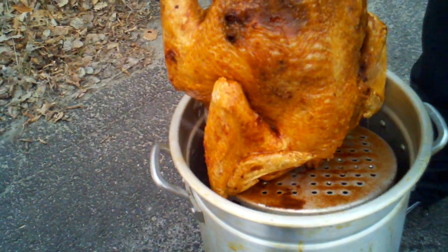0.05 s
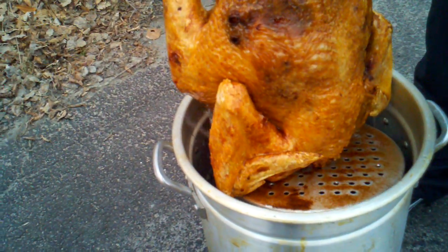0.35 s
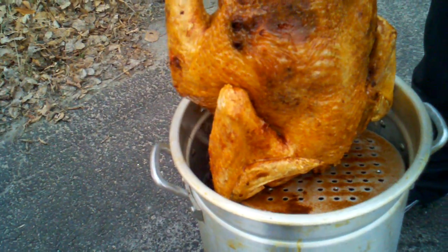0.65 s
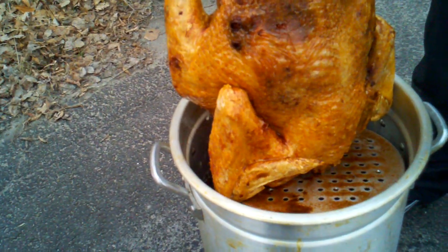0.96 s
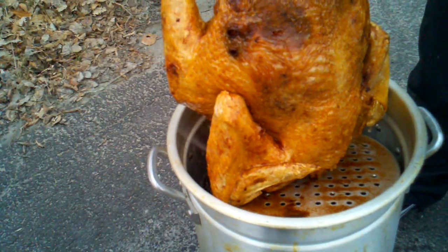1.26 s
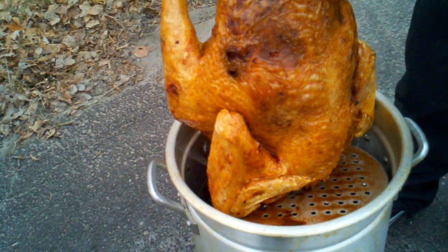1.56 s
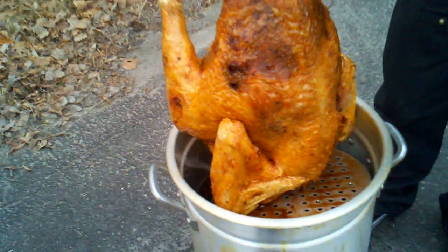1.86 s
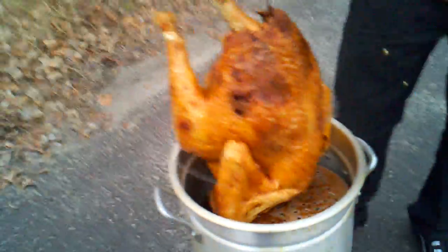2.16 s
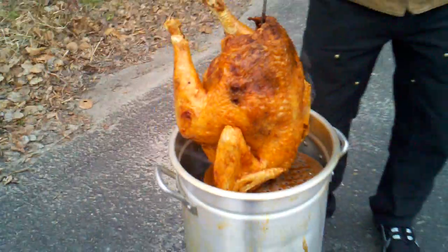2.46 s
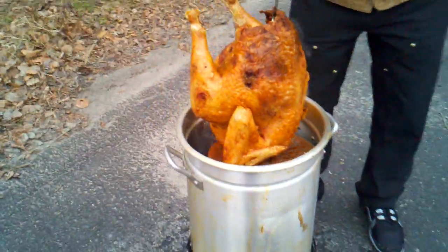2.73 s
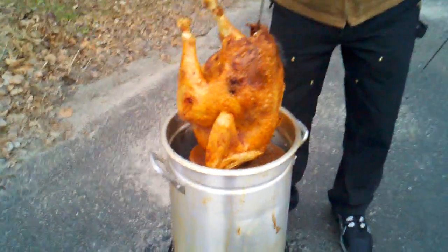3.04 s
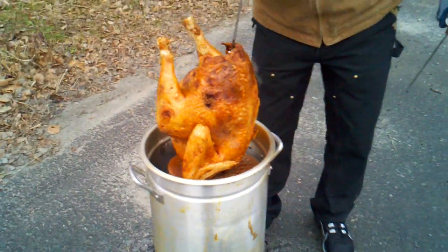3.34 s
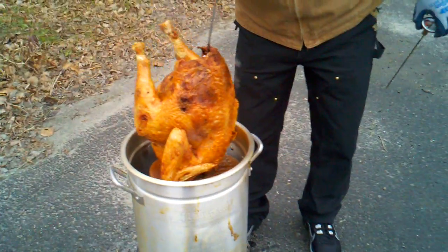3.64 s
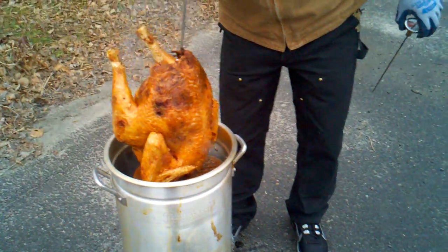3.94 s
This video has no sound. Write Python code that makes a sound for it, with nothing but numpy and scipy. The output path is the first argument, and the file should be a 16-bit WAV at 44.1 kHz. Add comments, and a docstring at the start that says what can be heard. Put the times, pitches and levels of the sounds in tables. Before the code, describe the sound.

Hot oil sizzles, bubbles and pops in a pot over a roaring gas burner outdoors.

```python
"""On a driveway outdoors, a fried turkey is held over a pot of hot oil on a gas burner.
The flame roars and makes the pot hum. Steam bubbles ring in the oil, and thousands of tiny bursts
blend into a sizzle. Water drops pop, and oil spits on hot metal. Midway come a hollow, falling gurgle
and a shoe scuff, later a soft footstep. The microphone backs away and the sizzle fades."""
import sys
import numpy as np
from scipy import signal
from scipy.fft import rfft, irfft
from scipy.io import wavfile

SR = 44100
rng = np.random.default_rng(int(sys.argv[2]) if len(sys.argv) > 2 else 0)


def store_pcm(level_fs):
    """Save levels as 16-bit WAV."""
    pcm = np.round(np.clip(level_fs, -1, 1) * 32767).astype(np.int16)
    wavfile.write(sys.argv[1], SR, np.atleast_2d(pcm).T)


N = 176400
TIME = np.arange(N) / SR
FREQS = np.maximum(np.arange(N // 2 + 1) * SR / N, 1)

# how alike the left and right noise are: (frequency [Hz], likeness [-1 to 1])
STEREO_LIKENESS = [(30, 0), (90, 0.34), (300, 0.45), (620, 0.89), (1100, 0.6), (2000, 0), (4000, 0),
                   (14000, 0)]
# the fade as the microphone backs away: (time [s], level [dB])
DISTANCE_FADE = [(0, 0.5), (1.3, 1.5), (2, -1), (2.7, -1.6), (3.3, -4), (4, -6)]
# the tone of the flame's roar: (frequency [Hz], level [dB per Hz])
ROAR_TONE = [(25, -101), (42, -100), (57, -83), (70, -87), (85, -66), (108, -72.5), (140, -71),
             (180, -66.5), (290, -70.5), (410, -72.5), (520, -68.5), (630, -66), (760, -72.5), (950, -77.5),
             (1500, -80.5), (2100, -75), (2800, -102), (6000, -105)]
# how the roar rises and falls: (time [s], level [dB])
ROAR_LOUDNESS = [(0, -0.5), (1.0, 0), (1.5, -0.5), (1.8, 3.5), (2.1, 1), (2.6, -.5), (3.3, -0.8), (4, -3)]
# low hums of burner and pot, plus one faint, thin high tone: (pitch [Hz], width [Hz], level [dB])
HELD_TONES = [(119.5, 5, -56.5), (240, 6, -58), (665, 7, -54.5), (880, 4, -59.5), (1064, 4, -60),
              (1240, 10, -63), (1591, 4, -65), (3854, 8, -67)]
# the tone of a shoe scuff: (pitch [Hz], width [Hz], relative level [dB])
SCUFF_TONE = [(830, 210, -1.5), (1520, 220, -2), (1920, 1300, 3.5)]
# the path of the gurgle: (time [s], pitch [Hz], level [dB])
GURGLE_PATH = [(1.03, 591, -60), (1.14, 590, -43.5), (1.3, 621, -46), (1.56, 650, -51), (1.61, 690, -39),
               (1.65, 685, -33), (1.685, 655, -34), (1.71, 581, -38), (1.74, 580, -49), (1.9, 540.5, -48.5),
               (1.96, 616, -39), (2.02, 619, -57)]
# how the bubbling rises and falls: (time [s], level [dB])
BUBBLE_LOUDNESS = [(0, -47), (1.2, -45), (1.7, -44.5), (2.3, -43), (2.7, -51), (3.3, -48.5), (4, -55.5)]
# large bubbles bursting: (time [s], level [dB], pitch [Hz])
BIG_BUBBLES = [(0.104, -32, 1610), (.224, -28, 1500), (.875, -39, 1700), (1.13, -33, 1240),
               (1.225, -30.5, 1330), (1.538, -35, 1350), (1.646, -29, 1980), (1.658, -28, 1590),
               (1.707, -35, 1350), (1.878, -33, 1300), (2.042, -30, 1500), (2.204, -32, 1540),
               (2.403, -30, 1900), (3.161, -28.5, 1980)]
# oil hitting hot metal: (time of peak [s], half length [s], level [dB])
OIL_SPITS = [(0.397, 0.012, -36), (1.88, 0.049, -31), (2.236, 0.019, -42), (2.41, 0.021, -52)]
# the tone of a spit: (pitch [Hz], width [Hz], relative level [dB])
SPIT_TONE = [(3750, 950, 2), (4110, 220, -1.5), (5770, 730, 6.5), (9000, 2500, -27)]
# water drops bursting: (time [s], crack [dB], spit [dB], knock [dB], time to fall 60 dB [s], snap [dB])
DROP_POPS = [(.0722, -23.5, -29, -44, 0.021, -10), (.3032, -14.5, -33, -52, 0.012, -8),
             (0.3506, -23, -48, -45, 0.017, -26), (0.3682, -31, -39, -31, .014, -17),
             (0.83, -40, -37, -33, 0.018, -26), (0.9824, -21.5, -33, -50, 0.03, -14),
             (1.1562, -34, -47, -33, 0.012, -30), (1.2292, -28, -25.5, -36, 0.05, -30),
             (1.4584, -20, -36, -37, 0.0072, -7), (1.795, -25, -41, -29, 0.017, -18),
             (2.1447, -18.5, -28.5, -25.5, 0.016, -8), (2.3825, -32, -31.5, -50, .03, -34),
             (3.0182, -33, -36, -41, 0.014, -14), (3.2735, -34.5, -37, -42, 0.019, -21)]
# the tone of a drop's bright crack: (pitch [Hz], width [Hz], relative level [dB])
CRACK_TONE = [(8320, 810, 3), (8900, 140, 11.5), (11700, 1300, 2)]
# the smallest bubbles: (rate [per s], lowest pitch [Hz], highest pitch [Hz], ring [cycles], level [dB])
TINY_BUBBLES = [(260, 3400, 6500, 30, -52), (260, 7600, 9600, 45, -44.5)]
# the tone of the sizzle: (frequency [Hz], level [dB per Hz])
SIZZLE_TONE = [(1000, -94), (2700, -81.5), (3500, -81.5), (5000, -82), (6000, -76), (6900, -80),
               (7800, -73), (9200, -72), (10300, -78), (11300, -78), (12200, -77.5), (14000, -78)]
# how the sizzle rises and falls: (time [s], level [dB])
SIZZLE_LOUDNESS = [(0, -2), (.27, -1.5), (.45, -2), (.72, -0.5), (.9, -0.5), (1.0, -2), (1.3, -3),
                   (1.42, 0), (1.62, 2), (1.77, 1.5), (1.9, 5.5), (1.98, 1), (2.16, -2), (2.24, 5),
                   (2.33, -2), (2.42, 4), (2.52, -1), (2.66, -0.5), (2.78, -3), (2.9, 0.5), (3.22, -0.5),
                   (3.4, -2), (3.62, -1), (3.74, -3.5), (4, -3.5)]
# how each band of the sizzle moves: (frequency [Hz], strength of the fade [factor], flicker [dB])
SIZZLE_BANDS = [(4000, 0.13, 3.5), (7000, 0.076, 2.75), (7900, 2.3, 4), (9100, 0.45, 1.5),
                (10700, 0.27, 2.5)]
# how much of each side is taken away from the other: (frequency [Hz], share [0 to 1])
WIDENING = [(300, 0.017), (700, 0.4), (1300, 0.78), (2500, 1), (3000, 0.7), (3950, 0.47), (4600, 0.27),
            (7800, 0.17), (13000, 0.097)]


def from_db(db):
    """Turn decibels into a number to multiply by."""
    return 10 ** (np.asarray(db) / 20)


def rms_one(x):
    """Scale a sound so that its average strength (rms) is 1."""
    return x / np.sqrt(np.mean(x ** 2) + 1e-20)


def in_time(rows):
    """Join a table's points over time, giving one curve for each column after the first."""
    times, *columns = np.transpose(rows)
    return [np.interp(TIME, times, column) for column in columns]


def per_hz(points):
    """Read a table at every frequency."""
    hz, value = np.transpose(points)
    return np.interp(np.log(FREQS), np.log(hz), value)


def coloured(x, tone):
    """Give white noise of strength 1 a tone, in dB per Hz."""
    return irfft(rfft(x) * from_db(per_hz(tone)) * np.sqrt(SR / 2), N)


def drift(rate_hz):
    """A random wobble of strength 1, mostly slower than rate_hz."""
    return rms_one(irfft(rfft(rng.standard_normal(N)) / (1 + (FREQS / rate_hz) ** 2), N))


def stereo_noise():
    """White noise at two microphones, most alike in the low middle pitches."""
    alike = np.clip(per_hz(STEREO_LIKENESS), -.99, .99)
    mid, side = irfft(rfft(rng.standard_normal((2, N))) * np.sqrt([1 + alike, 1 - alike]), N)
    return np.array([mid + side, mid - side]) / np.sqrt(2)


def resonate(x, hz, width_hz):
    """Make a sound ring at one pitch; a smaller width rings longer."""
    r = np.exp(-np.pi * width_hz / SR)
    feedback = [1, -2 * r * np.cos(2 * np.pi * hz / SR), r * r]
    return signal.lfilter(np.array([1, 0, -1]) * (1 - r * r) / 2, feedback, x + 1e-18)


def resonant_noise(tone):
    """Noise of strength 1, gathered around a few pitches."""
    air, out = stereo_noise(), 0
    for k, (hz, width, db) in enumerate(tone):
        shifted = np.roll(air, k * SR // 3, axis=1)  # keeps the bands unrelated
        band = resonate(resonate(shifted, hz, 2 * width), hz, 2 * width)
        out = out + from_db(db) * rms_one(band)
    return rms_one(out)


def clicks(per_s, spread_db):
    """Random clicks, many small and a few large."""
    sizes = from_db(spread_db * np.minimum(rng.exponential(1, N), 5))
    return sizes * rng.choice([-1, 1], N) * (rng.random(N) < per_s / SR)


def swell(peak_s, half_s, db):
    """A bell-shaped rise and fall."""
    return from_db(db) * np.exp(-.5 * ((TIME - peak_s) / half_s) ** 2)


def burst(start_s, decay_s):
    """A sudden start that falls by 60 dB in decay_s."""
    return (TIME >= start_s) * from_db(-60 * np.clip((TIME - start_s) / decay_s, 0, 3))


def bubble_cloud(per_s, low_hz, high_hz, cycles, spread_db, pitches):
    """Bubbles appear at random, and each rings briefly at one of several pitches."""
    alike, out = 0.17, 0  # left and right are only a little alike
    for hz in np.geomspace(low_hz, high_hz, pitches):
        births = clicks(per_s / pitches, spread_db)
        sides = np.sqrt(alike) + np.sqrt(1 - alike) * rng.choice([-1, 1], (2, N))
        width_hz = np.log(1000) / np.pi * hz / cycles  # falls 60 dB in that many cycles
        out = out + rms_one(resonate(births * sides, hz, width_hz))
    return rms_one(out)


def burner():
    """The gas flame roars and sets burner and pot humming low; a faint, thin high tone sounds too."""
    air = stereo_noise()
    tones = sum(from_db(db) * rms_one(resonate(air, hz, width)) for hz, width, db in HELD_TONES)
    roar = coloured(stereo_noise(), ROAR_TONE)
    roar_db, = in_time(ROAR_LOUDNESS)
    fade_db, = in_time(DISTANCE_FADE)
    return from_db(roar_db) * roar + from_db(0.63 * fade_db) * tones


def steps():
    """A shoe scuffs the asphalt; later a foot lands with a soft thud."""
    scuff = swell(peak_s=1.852, half_s=0.0076, db=-29) * resonant_noise(SCUFF_TONE)
    thud = swell(peak_s=2.935, half_s=0.024, db=-41.5) * resonant_noise([(189, 200, 0)])
    return scuff + thud


def gurgle():
    """A hollow, rough note that creeps up, sinks in pitch and lifts again at the end."""
    hz, db = in_time(GURGLE_PATH)
    wobble_hz = 52 * drift(rate_hz=94)
    rough_db = 3 * drift(rate_hz=63)
    phase = 2 * np.pi * np.cumsum(hz + wobble_hz) / SR
    sounding = (TIME > GURGLE_PATH[0][0]) & (TIME < GURGLE_PATH[-1][0])
    return sounding * from_db(db) * rms_one(from_db(rough_db) * np.sin(phase))


def bubbling():
    """Steam bubbles ring in the oil, and a few large ones burst with a plop."""
    level_db, = in_time(BUBBLE_LOUDNESS)
    cloud = bubble_cloud(per_s=480, low_hz=1173, high_hz=2403, cycles=24.4, spread_db=1.5, pitches=18)
    air = stereo_noise()
    plops = sum(from_db(db) * burst(start_s, decay_s=0.034) * rms_one(resonate(air, hz, width_hz=370))
                for start_s, db, hz in BIG_BUBBLES)
    wobble_db = 0.8 * drift(rate_hz=7.2)
    return from_db(level_db + wobble_db) * cloud + plops


def spits():
    """Oil hits hot metal and gives short swells of hiss."""
    return sum(swell(*spit) for spit in OIL_SPITS) * resonant_noise(SPIT_TONE)


def pops():
    """Water drops burst in the oil: a quick crack, then a faint tail from the pot."""
    tail_db, tail_s = -24.5, 0.077
    shapes = np.array([burst(start_s, decay_s) + from_db(tail_db) * burst(start_s, tail_s)
                       for start_s, *_, decay_s, _ in DROP_POPS])
    gains = from_db([levels for _, *levels, _, _ in DROP_POPS])
    crack, spit, knock = gains.T @ shapes  # each adds up all the drops
    return (crack * resonant_noise(CRACK_TONE) + spit * resonant_noise(SPIT_TONE)
            + knock * resonant_noise([(1520, 520, 0)]))


def snaps():
    """Each drop's pop opens with one sharp pulse, which reaches the left microphone first."""
    hz, width_hz, lag_s = 8700, 9200, 0.00034
    pulses = np.zeros((2, N))
    for start_s, *_, db in DROP_POPS:
        pulses[0, int(start_s * SR)] = pulses[1, int((start_s + lag_s) * SR)] = from_db(db)
    return resonate(pulses, hz, width_hz) * SR / (np.pi * width_hz)


def crackle():
    """The smallest bubbles tick brightly, rising and falling with the sizzle."""
    ticks = sum(from_db(db) * bubble_cloud(per_s, low_hz, high_hz, cycles, spread_db=1.4, pitches=7)
                for per_s, low_hz, high_hz, cycles, db in TINY_BUBBLES)
    return from_db(in_time(SIZZLE_LOUDNESS)[0] + in_time(DISTANCE_FADE)[0]) * ticks


def spatter(per_s=3000, decay_s=0.036, groups=14, echo_samples=700):
    """Thousands of tiny bursts bounce around in the pot, so each gets a short, noisy echo."""
    dying, out = from_db(-60 * TIME[:echo_samples] / decay_s), 0
    for _ in range(groups):
        bursts = clicks(per_s / groups, spread_db=2.5)
        echo = dying * rng.standard_normal((2, echo_samples))
        out = out + signal.oaconvolve(bursts[None], echo, axes=1)[:, :N]
    return rms_one(out)


def sizzle(bands=14):
    """Frying oil: spatter over a smooth hiss, with each band of pitches flickering on its own."""
    frying = from_db(-4.5) * spatter() + from_db(-5) * stereo_noise()
    spectrum = rfft(coloured(frying, SIZZLE_TONE))
    level_db = in_time(SIZZLE_LOUDNESS)[0] + 1.24 * drift(rate_hz=7.9)
    fade_db, = in_time(DISTANCE_FADE)
    at_hz, fade_strength, flicker_db = np.transpose(SIZZLE_BANDS)
    centres, out = np.geomspace(3000, 14000, bands), 0
    for hz, only_this_band in zip(centres, np.eye(bands)):
        band = irfft(spectrum * np.interp(FREQS, centres, only_this_band), N)
        band_db = level_db + np.interp(hz, at_hz, fade_strength) * fade_db
        band_db += np.interp(hz, at_hz, flicker_db) * drift(rate_hz=25.2)
        out = out + band * from_db(band_db)
    return out


def scene():
    """The burner, gurgle and steps, with the frying oil slightly to the right."""
    oil = sizzle() + crackle() + pops() + snaps() + spits() + bubbling()
    left_right = from_db([[-0.2], [0.2]])
    return burner() + oil * left_right + gurgle() + steps()


def record(dry):
    """The recorder widens the stereo sound and cuts the highest treble."""
    delay_s, cutoff_hz = 16.5 / SR, 13950
    dip_hz, dip_half_hz, dip_db = 2700, 270, -14
    share, sides = np.clip(per_hz(WIDENING), 0, 1), rfft(dry)
    late_other_side = np.exp(-2j * np.pi * FREQS * delay_s) * sides[::-1]
    wide = (sides - share * late_other_side) / np.sqrt(1 + share ** 2)
    # what both sides share is turned down between the roar and the sizzle
    dip = from_db(dip_db * np.exp(-((FREQS - dip_hz) / dip_half_hz) ** 4))
    wide = wide - (1 - dip) * wide.mean(axis=0)
    return irfft(wide / np.sqrt(1 + (FREQS / cutoff_hz) ** 300), N)


dry = scene()
out = record(dry)
store_pcm(out)
```